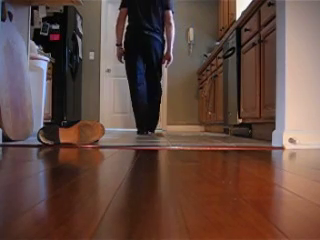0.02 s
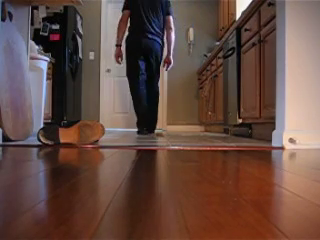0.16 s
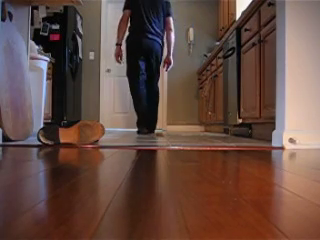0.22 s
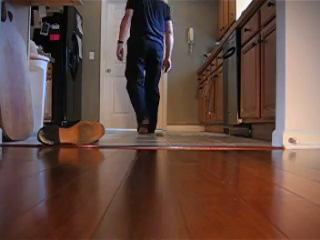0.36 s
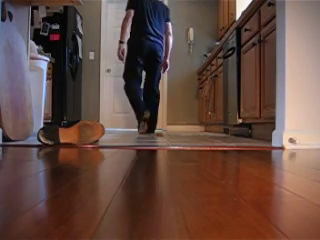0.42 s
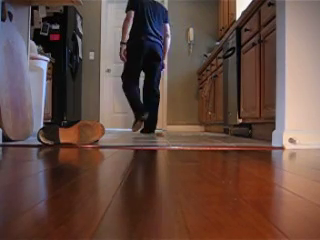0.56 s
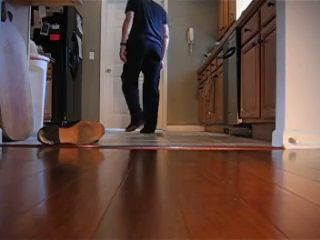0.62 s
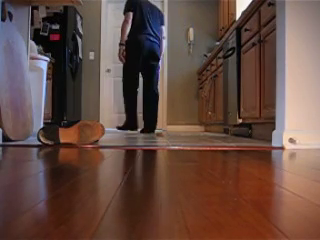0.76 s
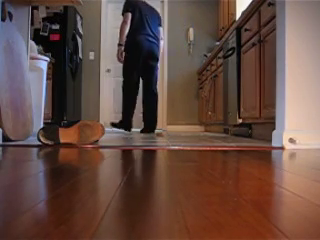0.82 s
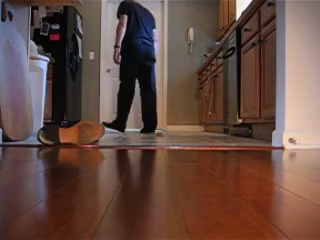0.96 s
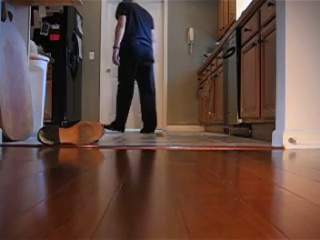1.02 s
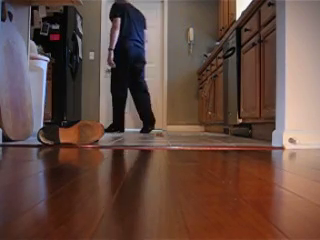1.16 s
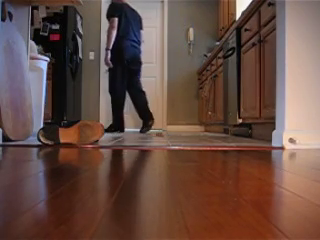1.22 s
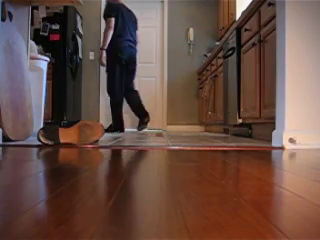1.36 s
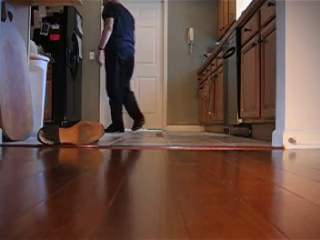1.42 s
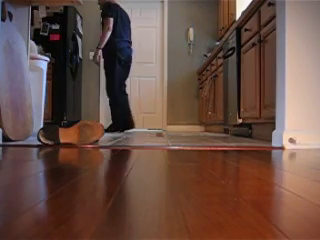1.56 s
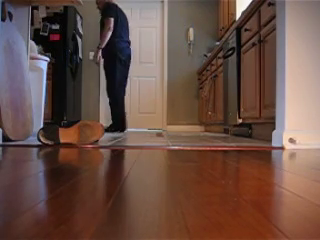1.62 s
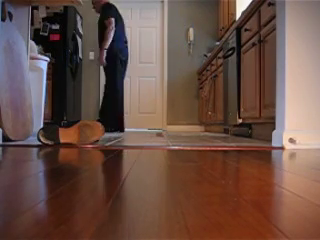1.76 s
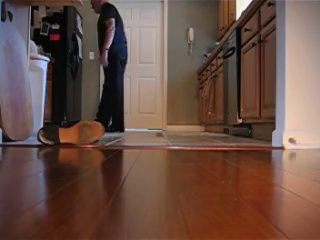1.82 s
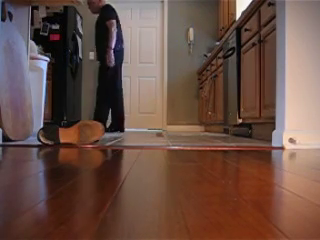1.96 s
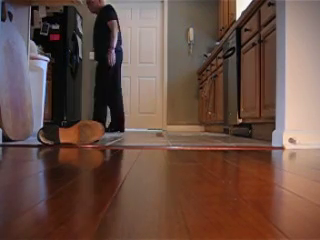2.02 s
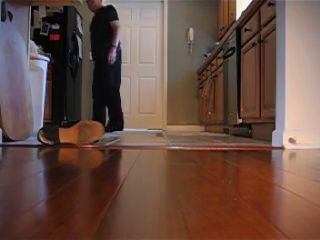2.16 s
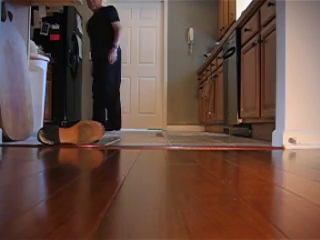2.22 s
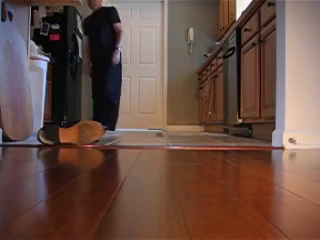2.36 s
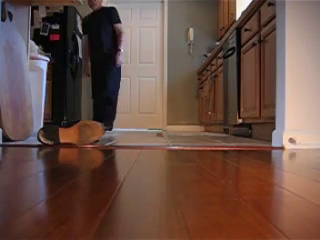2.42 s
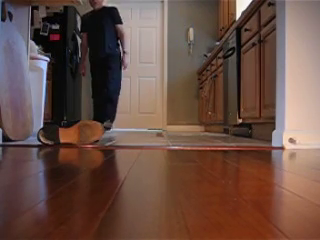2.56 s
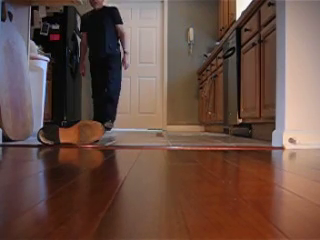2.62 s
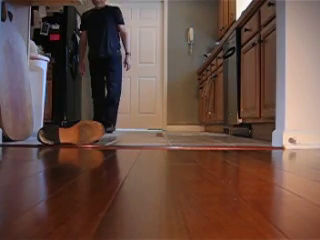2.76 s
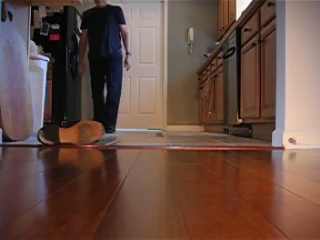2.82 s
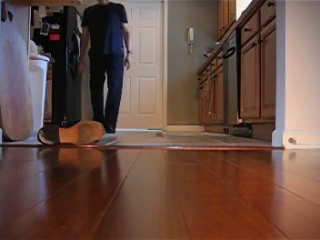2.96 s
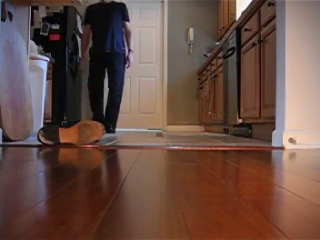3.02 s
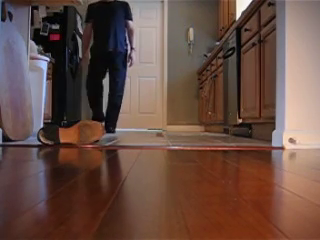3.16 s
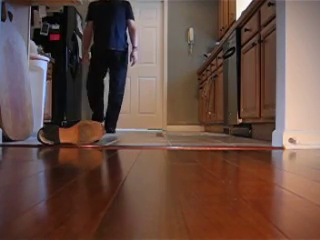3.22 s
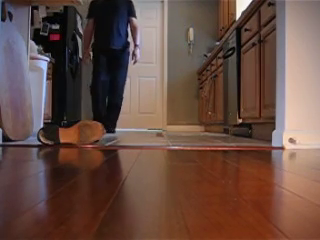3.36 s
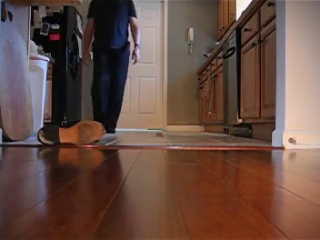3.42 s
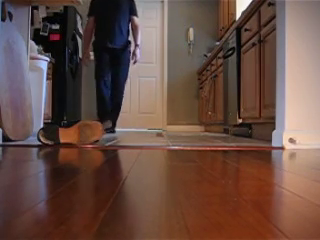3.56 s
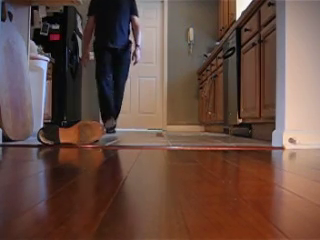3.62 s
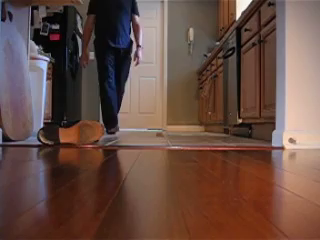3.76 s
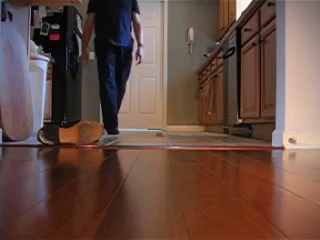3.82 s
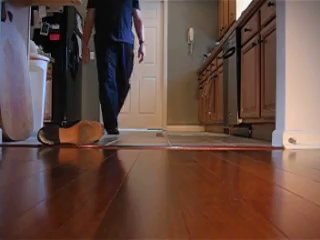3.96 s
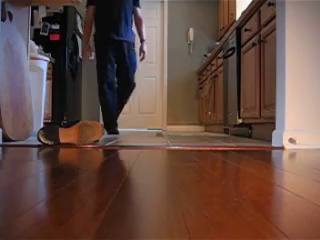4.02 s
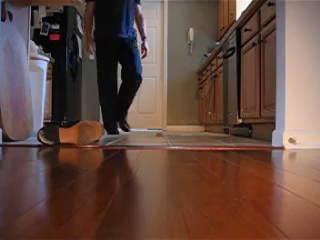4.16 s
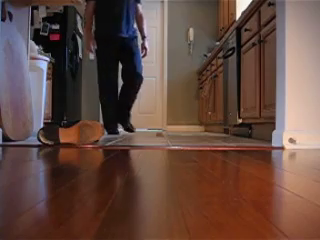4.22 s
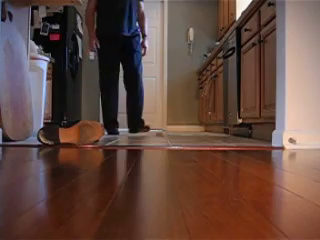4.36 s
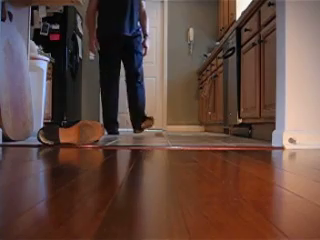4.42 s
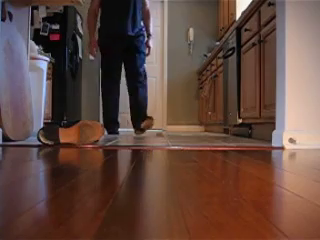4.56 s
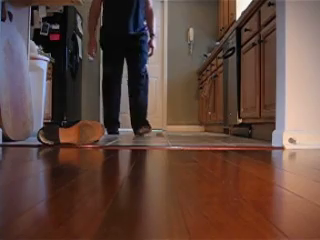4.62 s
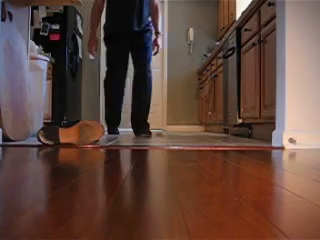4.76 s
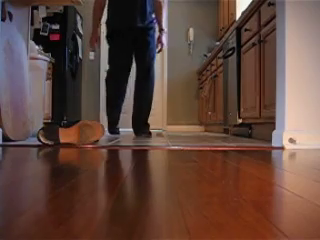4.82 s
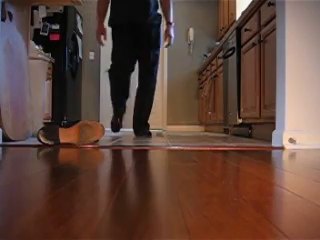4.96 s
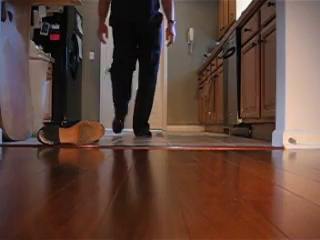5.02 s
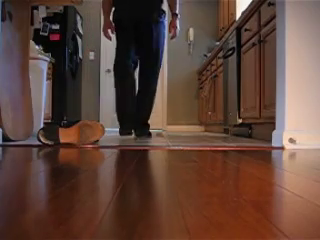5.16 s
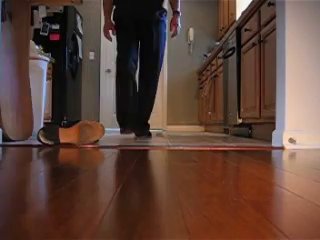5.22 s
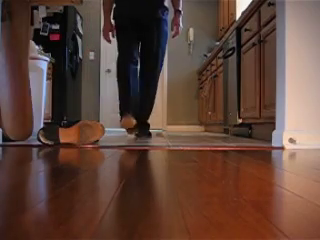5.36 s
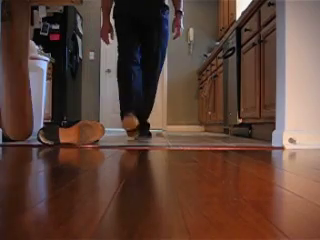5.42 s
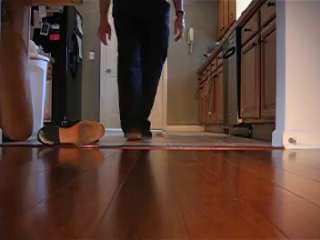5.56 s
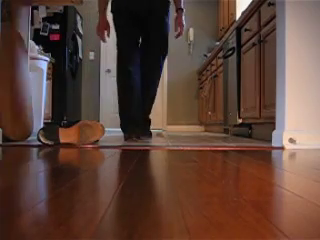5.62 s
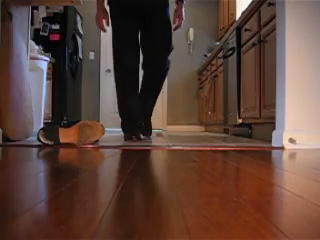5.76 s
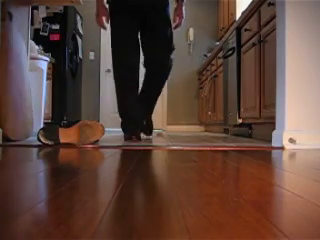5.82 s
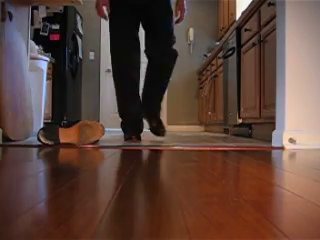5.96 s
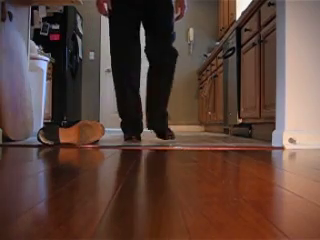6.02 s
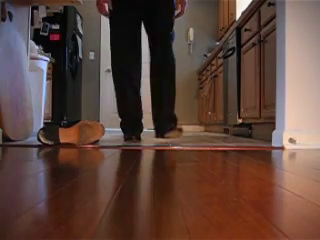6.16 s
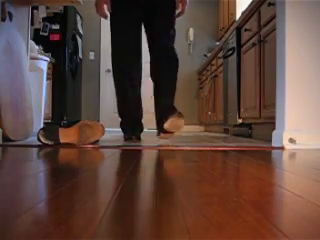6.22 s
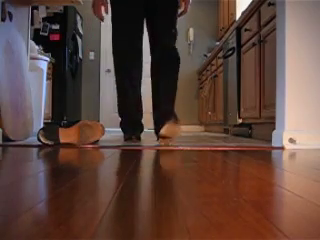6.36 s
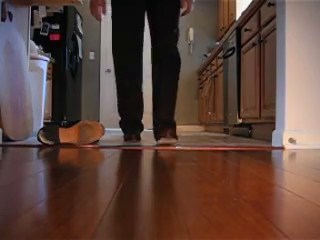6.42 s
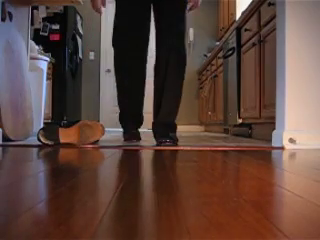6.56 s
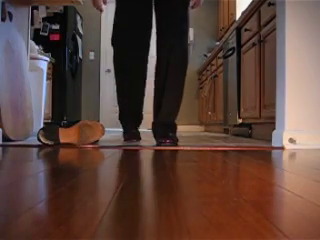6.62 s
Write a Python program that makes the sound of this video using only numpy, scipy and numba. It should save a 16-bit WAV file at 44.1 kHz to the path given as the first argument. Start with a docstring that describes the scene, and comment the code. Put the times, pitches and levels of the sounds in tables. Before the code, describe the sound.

Slow, loud footsteps in hard-soled shoes knock and click on a hard floor, with softer sole pats, small scuffs and a faint steady hum.

```python
"""An appliance hums throughout, a motor tone with thin steady tones over noise shaped as rumble and hiss.
Someone in hard loafers with metal heel taps walks slowly across a kitchen, eight heels about 0.9 s apart.
Each heel clicks, knocks and thuds as decaying modes, and the bare room rings on as filtered noise echoes.
Soles pat down as softer modes, the floor sways very low, and short bursts of uneven ticks scuff in between.
A small camera on the floor holds the blows down with a fast limiter."""
import sys
import numpy as np
from scipy import signal
from scipy.fft import rfft, irfft
from scipy.io import wavfile
from scipy.ndimage import uniform_filter1d
from numba import njit

SR = 44100
rng = np.random.default_rng(int(sys.argv[2]) if len(sys.argv) > 2 else 0)


def persist_wave(psi):
    """Save psi, clipped to +-1, as 16-bit WAV."""
    counts = np.round(np.clip(psi, -1, 1) * 32767).astype(np.int16)
    wavfile.write(sys.argv[1], SR, np.atleast_2d(counts).T)


N = 294588
TIME = np.arange(N) / SR

# heel strikes, levels relative: start_s, blow_db, ring_hz, ring_t60_s, second_ring_db, thud_db, tap_db, snap_db
HEEL_STRIKES = [(0.1058, -5.5, 943, 0.012, -1, -6.5, -3.5, -16.5),
                (1.0244, 1.5, 896, 0.026, -12, -18, -18, -22),
                (1.9190, -8, 955, 0.02, -4.5, -5.5, -5.5, -15.5),
                (2.7734, -2.5, 939, 0.047, -2, -11, -4, -2),
                (3.7515, -3, 964, 0.012, -9.5, -18.5, -2, -3.5),
                (4.6352, 0, 897, 0.016, -6.5, -4.5, -4, 2.5), (5.5134, -2.5, 990, 0.035, 3, 0.5, 0, 4),
                (6.3964, -4, 1002, 0.018, -11, -4.5, -2, 1.5)]


def undb(db):
    """Decibels to gain."""
    return 10 ** (np.asarray(db) / 20)


def unit(x):
    """Scale to rms 1."""
    return x / np.sqrt(np.mean(x ** 2))


def read(points, hz):
    """Read (Hz, value) points on a log-frequency axis."""
    f, value = np.transpose(points)
    return np.interp(np.log(hz + 1e-3), np.log(f), value)


def bins(size):
    """Frequencies of a spectrum of this many samples."""
    return np.arange(size // 2 + 1) * SR / size


def add(out, start_s, x):
    """Mix x into out from start_s."""
    i = max(int(start_s * SR), 0)
    out[i:i + len(x)] += x[:len(out) - i]


def walk(rate_hz):
    """Random levels, one per 1 / rate_hz seconds, smoothed twice, trimmed to N and scaled to rms 1."""
    hold = int(SR / rate_hz)
    steps = np.repeat(rng.standard_normal(N // hold + 1), hold)
    smooth = uniform_filter1d(uniform_filter1d(steps, hold), hold)
    return unit(smooth[:N])


def background(hum_waver_hz=3, hum_drift_rad=.2):
    """A wavering motor hum with thin steady tones, over rumble and hiss."""
    # thin appliance tones: pitch_hz, level_db, waver_db
    tone_list = [(117.8, -53.5, 2), (224, -54.5, 2), (239, -58, 2), (1825, -59.5, 0.7), (3655, -65.5, 0),
                 (4831, -54, 0.36)]
    # colour of the rumble and hiss: frequency_hz, relative density_db per Hz
    air_colour = [(12, 3.5), (20, 0.5), (38, -5.5), (56, -2), (72, -12.5), (88, -9.5), (110, -14),
                  (170, -15), (235, -16.5), (320, -19), (650, -23.5), (1800, -30.5), (4700, -30.5),
                  (5800, -38.5)]
    # motor shaft rate, level and slow waver of the level
    hum_hz, hum_db, hum_waver_db = 59.23, -37.5, 1.5
    air_db = -41.5

    hum_level = undb(hum_db + hum_waver_db * walk(hum_waver_hz))
    hum = hum_level * unit(np.sin(2 * np.pi * hum_hz * TIME + hum_drift_rad * walk(2.4)))
    tones = 0
    for hz, db, waver_db in tone_list:
        level = undb(db + waver_db * walk(5.8))
        # tones that waver more in level also drift more in phase
        drift = 0.51 * waver_db * walk(6.5)
        tones = tones + level * unit(np.sin(2 * np.pi * hz * TIME + drift))
    noise = rfft(rng.standard_normal(N))
    air = unit(irfft(noise * undb(read(air_colour, bins(N))), N))
    return hum + tones + undb(air_db) * air


def kitchen(build_s=0.0036, echo_db=14, count=8, size=49152):
    """A few cabinet echoes, then a swelling wash in which each half octave dies at its own rate."""
    # tone of the room's echoes: frequency_hz, level_db
    room_colour = [(30, -7), (140, -18), (220, -6), (600, -1.5), (1100, -4), (1450, -0.5), (2200, 1),
                   (3100, -6.5), (4200, -5.5), (5600, -11.5)]
    # how long the room rings: frequency_hz, t60_s
    room_t60 = [(50, 1.6), (120, 1.04), (260, 0.69), (650, 0.64), (1050, 0.69), (2000, 0.64), (4800, 0.62)]
    echo_s = .03  # the cabinet echoes fall within this time

    t, hz = np.arange(size) / SR, bins(size)
    echoes = rng.standard_normal(size)
    echoes[(rng.random(count) * echo_s * SR).astype(int)] += undb(echo_db)
    spectrum = rfft(echoes) * undb(read(room_colour, hz))
    tail = 0
    for centre in 20 * 2 ** np.arange(0, 9, .5):
        # overlapping triangles, half an octave to either side
        band = np.maximum(1 - 2 * np.abs(np.log2((hz + 1) / centre)), 0)
        tail = tail + irfft(spectrum * band, size) * undb(-60 * t / read(room_t60, centre))
    return tail * (1 - np.exp(-t / build_s))


def heard(sound, direct_db):
    """A sound at the floor reaches the microphone directly and through the room."""
    paths = kitchen()
    paths[0] += undb(direct_db)
    return signal.fftconvolve(sound, paths)


def mode(hz, t60, db):
    """A struck resonance, a decaying sine 0.1 s long; db sets its total energy."""
    t = TIME[:SR // 10]
    ring = np.sin(2 * np.pi * hz * t) * undb(-60 * t / t60)
    return undb(db) * ring / np.sqrt(np.sum(ring ** 2))


def flex(lag_scatter_s=0.0092):
    """The floor sags as the body's weight follows each heel and sways back, very low."""
    lag_s, rise_s, sway_hz, sway_t60_s = .06, .04, 51.4, 0.79
    flex_db = -27  # gain after a 0 dB blow
    out, t = np.zeros(N), TIME[:SR]
    envelope = (1 - np.exp(-t / rise_s)) * undb(-60 * t / sway_t60_s)
    sway = np.sin(2 * np.pi * sway_hz * t) * envelope
    for start_s, blow_db, *_ in HEEL_STRIKES:
        lag = lag_s + lag_scatter_s * rng.standard_normal()
        add(out, start_s + lag, undb(flex_db + blow_db) * sway)
    return out


def scuffs(grain_db=5, grain_cycles=5.7):
    """A dragged shoe catches on the floor in a short swell of uneven ticks, each ringing a few cycles."""
    # scuffs, leather low and metal high: start_s, length_s, level_db (loudest 10 ms), centre_hz
    scuff_list = [(0.459, 0.017, -46.5, 4720), (0.841, 0.011, -43, 536), (1.328, 0.021, -44, 4150),
                  (1.343, 0.0079, -34.5, 4530), (1.827, 0.021, -46, 745), (2.158, 0.068, -48.5, 2920),
                  (4.415, 0.044, -52, 2580), (6.184, 0.0088, -42, 774), (6.239, 0.023, -55, 890)]
    out = np.zeros(N)
    for start_s, length_s, db, hz in scuff_list:
        ticks, sizes = rng.standard_normal((2, SR // 4))
        swell = np.sin(np.pi * np.minimum(TIME[:len(ticks)] / length_s, 1))
        uneven = ticks * undb(grain_db * sizes) * swell
        drag = signal.fftconvolve(uneven, mode(hz, grain_cycles / hz, 0))
        rub = heard(drag, direct_db=28)
        loudest = np.sqrt(np.max(uniform_filter1d(rub ** 2, size=SR // 100)))
        add(out, start_s, undb(db) * rub / loudest)
    return out


def shoe(ring_hz, thud_hz, thud_db, tap_hz, tap_db, ring_t60, thud_t60=0.006):
    """One blow rings the shoe's hard block, the floor under it and the metal tap."""
    # modes of the metal tap: ratio to tap_hz, t60_s, level_db
    tap_modes = [(1.003, 0.0014, -3.5), (1.022, 0.018, -23), (1.33, 0.0036, -6.5), (1.701, 0.0019, -13.5)]
    # the block's broad knock: pitch_hz, t60_s, level_db
    knock = (886, 0.014, -9)
    # the floor's low boom under every foot: pitch_hz, t60_s, level_db
    boom = (225, 0.018, -15.5)
    block = mode(ring_hz, ring_t60, 0) + mode(*knock)
    floor = mode(thud_hz, thud_t60, thud_db) + mode(*boom)
    tap = sum(mode(tap_hz * ratio, t60, db + tap_db) for ratio, t60, db in tap_modes)
    return block + floor + tap


def soles(step_db=-14):
    """The front of the shoe comes down more softly, mostly just after the heel."""
    # soles patting down, levels relative: start_s, blow_db, tap_db
    sole_pats = [(0.155, -33.5, 11), (0.276, -23, -16), (1.112, -9.5, -10.5), (1.140, -17, -24),
                 (2.820, -9.5, -14), (3.800, -10, -13), (4.700, -10, -5), (5.580, -10, -7.5),
                 (5.660, -16, -6.5), (6.422, -10.5, 0.5), (6.466, -8.5, -22), (6.520, -24, -7)]
    # the softer a sole lands, the larger the thud's share
    thud_at_0_db, thud_db_per_db = -8, -0.65
    out = np.zeros(N)
    for start_s, blow_db, tap_db in sole_pats:
        thud_db = thud_at_0_db + thud_db_per_db * blow_db
        pat = shoe(ring_hz=940, thud_hz=418, thud_db=thud_db, tap_hz=1980, tap_db=tap_db, ring_t60=0.0088)
        add(out, start_s, undb(step_db + blow_db) * heard(pat, direct_db=18.5))
    return out


def heels(step_db=-14, near_ring_db=2, graze_db=0, graze_s=.0025,
          snap_gain_db=5, snap_hz=3250, snap_t60=0.0041, snap_lag_s=.0006):
    """The heel's edge grazes the floor, the weight lands, and the tap snaps flat an instant later."""
    # the heel block's second ring: pitch_hz, t60_s
    second_ring = (1052.5, 0.039)
    # a heavier heel thuds lower
    thud_at_0_db_hz, thud_hz_per_db = 390, -17
    tap_hz = 2273  # the tap's modes are multiples of this
    out = np.zeros(N)
    for start_s, blow_db, ring_hz, ring_t60, second_db, thud_db, tap_db, snap_db in HEEL_STRIKES:
        thud_hz = thud_at_0_db_hz + thud_hz_per_db * blow_db
        body = shoe(ring_hz, thud_hz, thud_db, tap_hz, tap_db, ring_t60)
        body = body + mode(*second_ring, second_db)
        blow = undb(step_db + blow_db) * body
        add(out, start_s - graze_s, undb(graze_db) * blow)
        add(out, start_s, heard(blow, direct_db=11))
        # the main ring and the snap carry straight along the floor to the microphone
        add(out, start_s, mode(ring_hz, ring_t60, near_ring_db))
        add(out, start_s + snap_lag_s, -mode(snap_hz, snap_t60, snap_gain_db + snap_db))
    return out


def scene():
    """Steps, scuffs and the humming kitchen, in mono."""
    return (heels() + soles() + scuffs() + background() + flex())[None]


@njit
def follow(x, attack, release):
    """Peak follower: quick to rise, slower to fall."""
    out, level = np.empty(len(x)), 0.
    for i in range(len(x)):
        size = abs(x[i])
        level += (size - level) * (attack if size > level else release)
        out[i] = level
    return out


def low_pass(x, hz):
    """Steep low-pass without phase shift."""
    return irfft(rfft(x) / (1 + (bins(N) / hz) ** 60), N)


def record(dry, limit_db=-11.5, attack_s=0.00074, release_s=0.018):
    """A narrow-band recorder: the limiter lets each first click through, and peaks past the rails clip."""
    band_hz, top_hz = 5850, 16000  # low-pass corners before and after the rails
    offset, rail = -.0466, .7  # full scale is 1
    x = dry[0]
    peak = follow(x, 1 / (attack_s * SR), 1 / (release_s * SR))
    gain = np.minimum(1, undb(limit_db) / (peak + 1e-9))
    x = low_pass(x * gain, band_hz)
    # the converter sits slightly off centre between its rails
    return low_pass(np.clip(x + offset, -rail, rail), top_hz)[None]


dry = scene()
out = record(dry)
persist_wave(out)
```